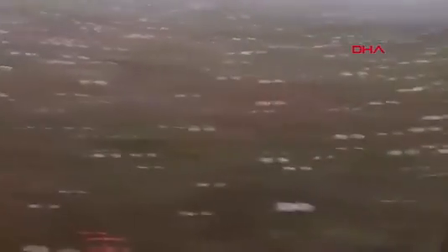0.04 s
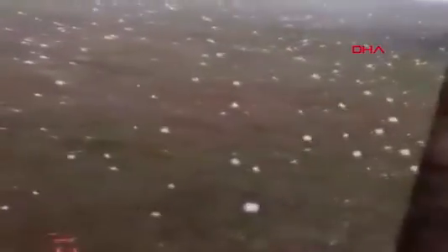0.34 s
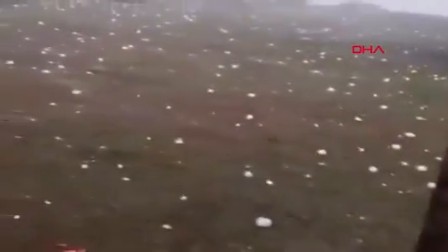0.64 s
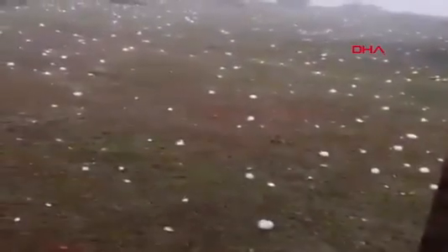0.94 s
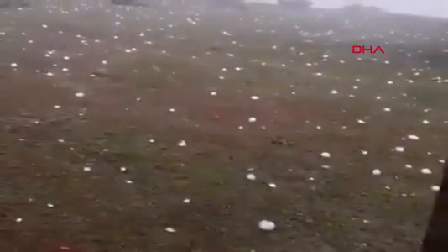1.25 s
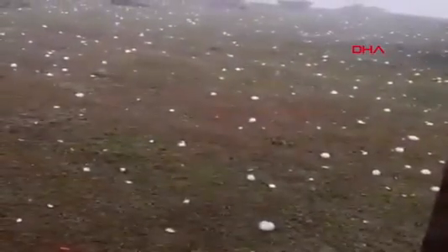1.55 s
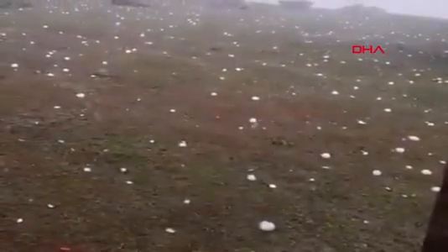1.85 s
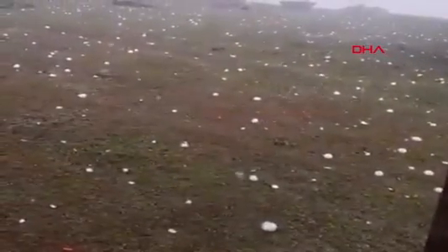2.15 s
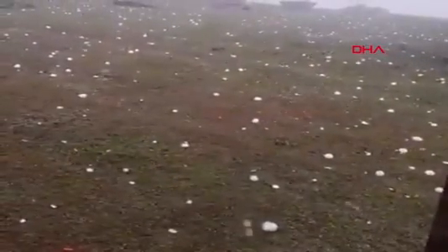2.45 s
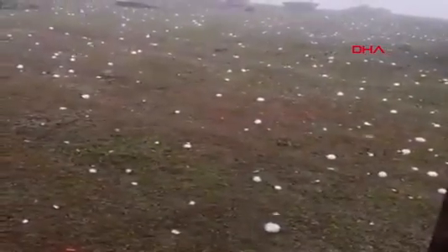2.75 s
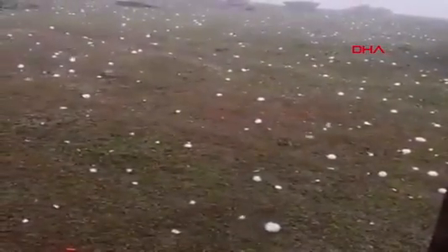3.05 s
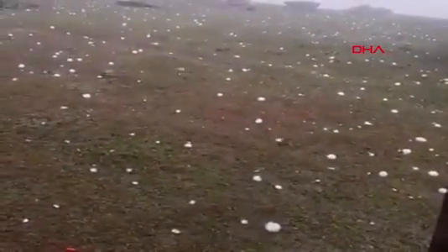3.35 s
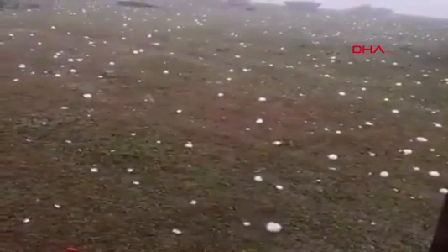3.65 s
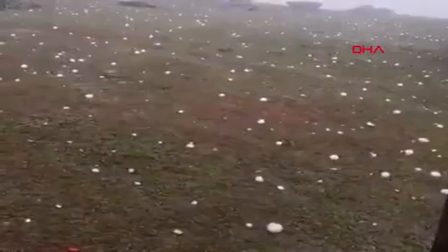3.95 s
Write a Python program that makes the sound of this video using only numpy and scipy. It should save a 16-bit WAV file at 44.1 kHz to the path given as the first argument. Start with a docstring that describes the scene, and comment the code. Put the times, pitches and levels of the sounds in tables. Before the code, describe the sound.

Large hailstones crash and rattle irregularly on roofing close by, while others land on grass with dull thuds and clicks. Heard from a shelter beside a field, with a steady rush of distant hail and low wind.

```python
"""A shelter at the edge of a grassy field, in a fall of large hailstones.
Single stones crash on roofing nearby, each a rattling swell that dies away; others land on the turf
with short dull thuds, some with a sharp click. A few ring a single sheet; one knocks on a hollow panel.
Small ice ticks all around, and distant stones merge into a steady rush over a low rumble of wind."""
import sys
import numpy as np
from scipy.fft import rfft, irfft, next_fast_len
from scipy.io import wavfile
from scipy.ndimage import map_coordinates

SR = 44100
rng = np.random.default_rng(int(sys.argv[2]) if len(sys.argv) > 2 else 0)


def store_wav(level_fs):
    """Save 16-bit WAV to argv[1]."""
    pcm = np.round(np.clip(np.atleast_2d(level_fs), -1, 1) * 32767)
    wavfile.write(sys.argv[1], SR, pcm.T.astype(np.int16))


N = 176400
TOP_HZ = 11250
LEAD_S = 0.00049  # delay between the ports; crashes, rings and knock lead left, thuds slightly right
OPPOSITE = np.array([[1], [-1]])  # left, right

CRASH_DB, CRASH_PAN_DB, BODY_WIDTH_OCT = -1.53, -0.8, 0.95
RATTLE_DB, RATTLE_PER_S = 1, 420
SPLASH_HZ, SPLASH_DB, SPLASH_T60_SHARE = (5300, 9440), -6, 0.45
# Body, clatter and treble bands: (low edge [Hz], high edge [Hz])
CRASH_BANDS = [(138, 757), (800, 3130), (3000, 3640)]
# Decay of the same bands: (share of the crash's t60 [ratio])
T60_SHARES = [1, 1, 0.86]
# Roofing spectrum: (frequency [Hz], density [dB])
ROOF_SPECTRUM = [(100, 4), (160, -1), (400, 2.5), (520, 0), (700, -0.5), (1150, -6.5), (1600, -8),
                 (2400, -16.5), (4000, -22), (5200, -15), (6400, -8), (7400, -13), (9500, -59)]
# Stones on the roofing, levels relative:
# (time [s], rise [s], t60 [s], body pitch [Hz], body [dB], clatter [dB], treble [dB])
ROOF_HITS = [(.09, 0.042, 0.62, 350, -26, -27, -31), (.165, 0.06, 0.89, 286, -16, -19, -30),
             (.315, 0.053, 0.98, 323, -12, -15, -23), (.475, 0.04, 0.42, 456, -13.5, -13.5, -25),
             (.666, 0.0086, 0.51, 402, -51, -26, -23.5), (.82, 0.029, 0.49, 378, -14.5, -17.5, -31.5),
             (1.082, 0.0028, 0.35, 500, -24.5, -28, -26), (1.1, 0.098, 1, 408, -43, -30.5, -32),
             (1.232, 0.018, 0.89, 560, -20.5, -28, -30), (1.31, 0.021, 0.49, 424, -16.5, -18.5, -19.5),
             (1.335, 0.037, 0.72, 388, -14.5, -15, -23), (1.541, 0.075, 0.92, 430, -23.5, -29, -38),
             (1.755, 0.067, 0.62, 328, -21.5, -27.5, -29.5), (2.037, 0.0011, 0.41, 344, -34, -28.5, -22.5),
             (2.335, 0.035, 0.55, 328, -14.5, -22, -34), (2.549, 0.047, 0.39, 340, -27, -30, -37),
             (2.712, 0.072, 1, 328, -21, -20.5, -27), (2.848, 0.011, 0.87, 285, -15.5, -14, -19),
             (2.872, 0.019, 0.55, 325, -14.5, -15.5, -19.5), (3.046, 0.024, 0.52, 470, -12, -14.5, -31),
             (3.315, 0.077, .8, 346, -21, -25, -31), (3.414, 0.023, 0.88, 330, -15.5, -14, -19),
             (3.484, 0.047, 0.48, 284, -15.5, -17, -32), (3.616, 0.018, 0.63, 440, -12, -17.5, -33.5),
             (3.812, 0.0061, 0.72, 378.5, -16, -29, -20), (3.82, 0.033, 0.42, 330, -28, -16, -38),
             (3.91, 0.046, 0.81, 360, -22, -31, -34.5)]


def roof_crashes():
    """Each stone sets the sheets rattling, the treble dying first. Hard hits add a splash of ice."""
    out, size = np.zeros((2, N)), 32768
    t, hz = np.arange(size) / SR, np.fft.rfftfreq(size, 1 / SR)
    low, mid, high = [amp(along(ROOF_SPECTRUM, hz)) * band(hz, lo, hi) for lo, hi in CRASH_BANDS]
    ice = band(hz, *SPLASH_HZ)
    wall_gain = 0.4 * band(hz, 870, TOP_HZ, order=1)  # nearby walls colour each crash differently
    for s, rise, t60, pitch, body_db, clatter_db, treble_db in ROOF_HITS:
        field = arriving(hz, direct_share=0.17) * echoes(hz, wall_gain, spread_s=.008, count=4)
        rattle = unit(amp(RATTLE_DB * wobble(RATTLE_PER_S, size)))
        hump = np.exp(-.5 * (np.log2((hz + 1) / pitch) / BODY_WIDTH_OCT) ** 2)
        splash_db = treble_db + SPLASH_DB + (treble_db - clatter_db)
        colours = low * hump, mid, high, ice
        levels_db = body_db, clatter_db, treble_db, splash_db
        for colour, db, share in zip(colours, levels_db, (*T60_SHARES, SPLASH_T60_SHARE)):
            noise = unit(irfft(field * colour))
            add(out, s, amp(db) * noise * rattle * swell(t, rise, t60 * share))
    return out * amp(CRASH_DB) * pan(CRASH_PAN_DB)


THUD_DB, THUD_RISE_CYCLES, GRASS_DB = -2.5, 0.63, -27.5
PATTER_PER_S, PATTER_DB, PATTER_SPREAD_DB, PATTER_HZ = 110, -21.5, 2, 366
# Near stones on the turf: (time [s], relative level [dB], pitch [Hz])
TURF_HITS = [(.105, -6, 340), (.146, -5, 340), (.184, -6, 257), (0.23, -2, 280), (.261, -14, 277),
             (.336, -5, 283), (0.38, -7, 224), (.549, -3, 556), (1.217, -3, 453), (1.259, -5, 606),
             (1.347, -2.5, 450), (1.513, -3, 706), (1.618, -5.5, 447), (1.727, -6, 440), (2.1736, -1, 450),
             (2.39, -4, 404), (2.413, -4.5, 430), (2.856, -2, 212), (3.077, -7, 594), (3.096, -6.5, 388),
             (3.276, -6, 366), (3.293, -9, 382)]


def turf():
    """Near stones thud on the turf; others patter at random farther out."""
    out = np.zeros((2, N))
    for s, db, hz in TURF_HITS:
        add(out, s, amp(THUD_DB + db) * thud(hz))
    for _ in range(int(PATTER_PER_S * N / SR)):
        size, pitch, side = rng.standard_normal(3)
        stone = thud(PATTER_HZ * np.exp(.35 * pitch))
        db = PATTER_DB + PATTER_SPREAD_DB * min(size, 2)
        add(out, rng.uniform(0, N / SR), stone * amp(db) * pan(2 * side))
    return out


def thud(hz):
    """A stone hits soft ground: about two cycles of dull push and a tiny snap of grass."""
    t = np.arange(SR // 40) / SR
    delay_s = LEAD_S * (1 + rng.uniform(0.072, 0.33) * OPPOSITE)
    age_s = np.maximum(t - delay_s, 0)
    rise = age_s * hz / THUD_RISE_CYCLES  # 1 at the crest
    envelope = (rise * np.exp(1 - rise)) ** 2
    phase = 2 * np.pi * (hz * age_s - THUD_RISE_CYCLES) + rng.uniform(0, np.pi / 2)
    return envelope * np.cos(phase) + amp(GRASS_DB) * snap(SNAP_HZ)


CHATTER_RAD, CHATTER_PER_S = 0.89, 168
# Square hits on one roof sheet: (time [s], pitch [Hz], level [dB])
SHEET_HITS = [(.222, 276, -12), (2.098, 340, -14), (3.058, 611, -17.5), (3.429, 702, -10.5),
              (3.523, 322, -13.5), (3.638, 414, -11.5)]


def ringing_sheets():
    """A square hit rings one sheet with a short hollow note; its phase wavers as the sheet chatters."""
    out, t = np.zeros((2, N)), np.arange(SR // 4) / SR
    delay_s = np.array([[0], [LEAD_S / 2]])
    for s, hz, db in SHEET_HITS:
        phase = 2 * np.pi * hz * (t - delay_s) + CHATTER_RAD * wobble(CHATTER_PER_S, len(t))
        add(out, s, amp(db) * np.sin(phase) * swell(t, rise_s=0.0069, t60_s=0.16))
    return out


KNOCK_AT_S, KNOCK_DB, LOWEST_MODE_T60_S, DAMPING_POWER = 2.039, -15, 0.63, 0.22
# Panel resonances: (centre [Hz], width [Hz], relative level [dB])
PANEL_MODES = [(270, 230, -7.5), (374, 130, -2), (714, 88, -3), (900, 32, -3.5), (1565, 100, -8.5),
               (1880, 210, -8), (2190, 260, -11), (3110, 200, -12)]


def panel_knock():
    """One stone sets a close hollow panel buzzing in broad resonances; the higher ones die sooner."""
    out, size = np.zeros((2, N)), 32768
    t, hz = np.arange(size) / SR, np.fft.rfftfreq(size, 1 / SR)
    field = arriving(hz, direct_share=0.79)
    for centre, width, db in PANEL_MODES:
        buzz = unit(irfft(field / (1 + (2 * (hz - centre) / width) ** 2)))
        t60 = LOWEST_MODE_T60_S * (PANEL_MODES[0][0] / centre) ** DAMPING_POWER
        add(out, KNOCK_AT_S, amp(KNOCK_DB + db) * buzz * swell(t, rise_s=0.0014, t60_s=t60))
    return out


SNAP_DECAY_S, SNAP_HZ = 0.0031, 2160
TICKS_PER_S, TICK_DB, TICK_SPREAD_DB, TICK_SPREAD_OCT = 70, -31, 5.5, 0.78
# Sharp clicks of near stones landing: (time [s], level [dB])
LANDING_CLICKS = [(1.514, -21.5), (1.727, -18), (1.789, -21.5), (2.174, -23.5), (2.39, -15)]


def ice_clicks():
    """Near stones click as they land, mostly atop their thuds; small ice ticks all around."""
    out = np.zeros((2, N))
    for s, db in LANDING_CLICKS:
        add(out, s, amp(db) * snap(SNAP_HZ))
    for _ in range(int(TICKS_PER_S * N / SR)):
        size, pitch, side = rng.uniform(-0.66, 1, 3)
        s = rng.uniform(0, N / SR)
        tick = snap(SNAP_HZ * 2 ** (TICK_SPREAD_OCT * (pitch - .5)))
        add(out, s, tick * amp(TICK_DB + TICK_SPREAD_DB * size) * pan(2 * side))
    return out


def snap(hz):
    """A tiny crack: a few milliseconds of noise around a pitch."""
    t = np.arange(SR // 40) / SR
    noise = rng.standard_normal((2, len(t)))
    burst = unit(filtered(noise, lambda f: band(f, hz / 2, hz * 2, order=3)))
    return burst * np.exp(-t / SNAP_DECAY_S)


FAR_DB, FAR_SWELL_DB, FAR_SWELL_PER_S = -26, 3.5, 14
# Distant hail spectrum: (frequency [Hz], density [dB])
FAR_SPECTRUM = [(100, -14), (160, -12), (260, -5), (380, -3.5), (700, -9.5), (1200, -10), (2400, -19),
                (4000, -25), (7000, -26.5), (11000, -58.5)]


def far_hail():
    """Countless distant stones merge into a grainy rush whose bands swell and sink on their own."""
    hz, spectrum = np.fft.rfftfreq(N, 1 / SR), rfft(rush(FAR_SPECTRUM))
    edges_hz = np.geomspace(20, 12000, 32)
    out = np.zeros((2, N))
    for lo, hi in zip(edges_hz, edges_hz[1:]):
        strip = irfft(spectrum * ((hz >= lo) & (hz < hi)), N)
        out += strip * amp(FAR_SWELL_DB * wobble(FAR_SWELL_PER_S, N))
    grain = amp(0.53 * wobble(260, N))
    return amp(FAR_DB) * unit(out * grain) * pan(db=-0.5)


WIND_DB = 1
# Wind strength: (time [s], relative level [dB])
WIND_LEVELS = [(0.0, -28.5), (0.41, -26), (0.86, -32.5), (3.82, -29), (4.0, -36.5)]
# Wind balance: (time [s], left minus right [dB])
WIND_BALANCE = [(0, -13), (1, -4), (4, 1)]
# Wind spectrum: (frequency [Hz], density [dB])
WIND_SPECTRUM = [(20, -22.5), (32, -28), (48, 0.5), (65, 5), (110, 7.5), (160, -0.5), (300, -48),
                 (700, -68)]


def wind():
    """Wind rumbles low, at first mostly on the right port."""
    return amp(WIND_DB + curve(WIND_LEVELS)) * rush(WIND_SPECTRUM) * pan(curve(WIND_BALANCE))


# Diffuse field: (frequency [Hz], left-right correlation [ratio])
COHERENCE = [(60, 0.63), (190, 1), (350, 0.77), (620, 0.36), (1100, -0.17), (2000, 0.2), (3500, 0.0053),
             (7000, 0.017)]


def diffuse(hz):
    """Stereo spectrum of noise from all around: alike in the bass, unrelated in the treble."""
    common, opposed = rng.standard_normal((2, len(hz))) + 1j * rng.standard_normal((2, len(hz)))
    angle = np.arccos(along(COHERENCE, hz)) / 2
    return np.cos(angle) * common + OPPOSITE * np.sin(angle) * opposed


def arriving(hz, direct_share):
    """Stereo noise spectrum, a share of its power straight from the left, the rest diffuse."""
    direct = diffuse(hz)[0] * np.exp(1j * np.pi * hz * LEAD_S * OPPOSITE)
    return np.sqrt(1 - direct_share) * diffuse(hz) + np.sqrt(direct_share) * direct


def rush(spectrum):
    """Coloured diffuse noise of rms 1."""
    hz = np.fft.rfftfreq(N, 1 / SR)
    return unit(irfft(diffuse(hz) * amp(along(spectrum, hz)), N))


def echoes(hz, gain, spread_s, count):
    """Comb response of a few early reflections, with unit power."""
    delays_s = rng.uniform(0, spread_s, (count, 1))
    reflections = np.exp(-2j * np.pi * hz * delays_s).sum(0)
    return (1 + gain * reflections) / np.sqrt(1 + count * gain ** 2)


def port_ripple(hz):
    """Reflections around the microphone ripple the treble at each port."""
    gain = .2 * band(hz, 2330, TOP_HZ, order=2)
    return np.array([echoes(hz, gain, spread_s=.009, count=6) for _ in range(2)])


def swell(t, rise_s, t60_s, hold_share=0.65):
    """Linear rise, a crest held for a share of the rise time, exponential decay."""
    decaying_s = np.maximum(t - rise_s * (1 + hold_share), 0)
    return np.minimum(t / rise_s, 1) * amp(-60 * decaying_s / t60_s)


def wobble(knots_per_s, size):
    """Smooth random curve."""
    return map_coordinates(rng.standard_normal(4096), [np.arange(size) * knots_per_s / SR], mode="wrap")


def amp(db):
    return 10 ** (np.asarray(db) / 20)


def unit(x):
    return x / np.sqrt(np.mean(x ** 2) + 1e-20)


def pan(db):
    """Stereo gains for a left-minus-right level."""
    return amp(.5 * OPPOSITE * db)


def along(points, hz):
    """(frequency [Hz], value) points on a log axis."""
    knots_hz, values = np.transpose(points)
    return np.interp(np.log(hz + 1), np.log(knots_hz + 1), values)


def curve(points):
    """(time [s], value) points, one value per sample."""
    return np.interp(np.arange(N) / SR, *np.transpose(points))


def band(hz, lo, hi, order=5):
    """Band-pass gain with soft edges."""
    return 1 / np.sqrt((1 + (lo / (hz + 1)) ** (2 * order)) * (1 + (hz / hi) ** (2 * order)))


def filtered(x, response):
    """Apply a complex frequency response."""
    size = x.shape[-1]
    padded = next_fast_len(size + 4096, True)
    hz = np.fft.rfftfreq(padded, 1 / SR)
    return irfft(rfft(x, padded) * response(hz), padded)[..., :size]


def add(out, s, sound):
    """Mix a stereo sound in at time s."""
    start = max(round(s * SR), 0)
    out[:, start:start + sound.shape[1]] += sound[:, :max(N - start, 0)]


def scene():
    """Hail near and far, over the wind."""
    rippled = filtered(roof_crashes() + far_hail(), port_ripple)
    return rippled + ringing_sheets() + ice_clicks() + panel_knock() + wind() + turf()


CLIP_LEVEL = .93
# Microphone response: (frequency [Hz], gain [dB])
MIC_RESPONSE = [(20, -0.5), (7000, -0.5), (7600, -4.5), (8100, -14.5), (11000, -7.5)]


def record(dry):
    """The microphone dulls the top, rounds off the highest peaks and limits the band."""
    dulled = filtered(dry, lambda hz: amp(along(MIC_RESPONSE, hz)))
    rounded = dulled / (1 + np.abs(dulled / CLIP_LEVEL) ** 8) ** (1 / 8)
    return filtered(rounded, lambda hz: (hz > 20) & (hz < TOP_HZ))


dry = scene()
out = record(dry)
store_wav(out)
```